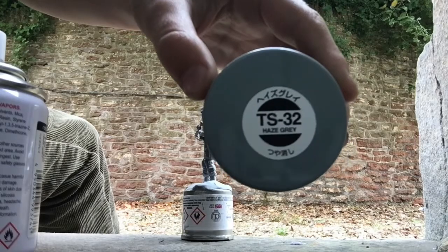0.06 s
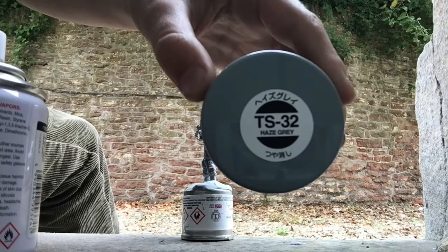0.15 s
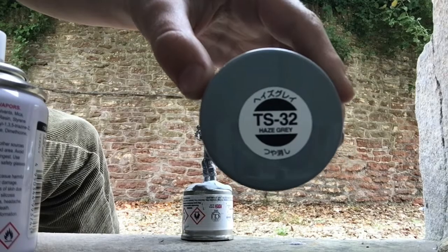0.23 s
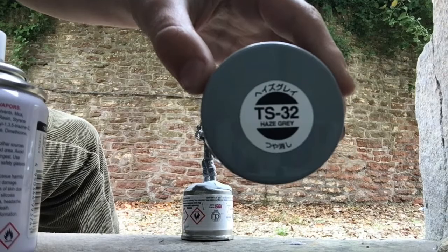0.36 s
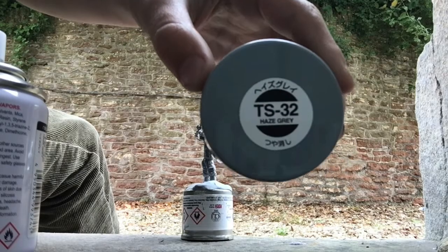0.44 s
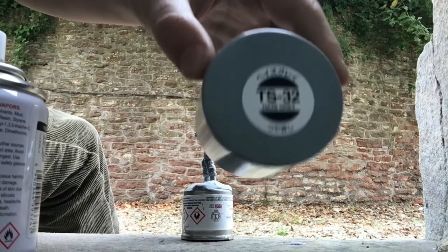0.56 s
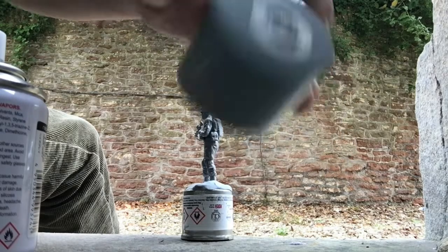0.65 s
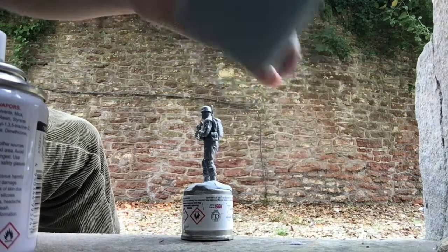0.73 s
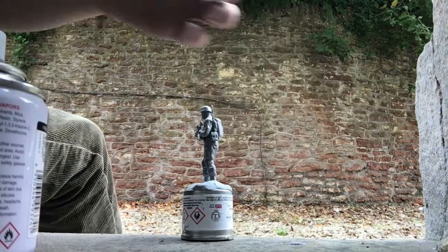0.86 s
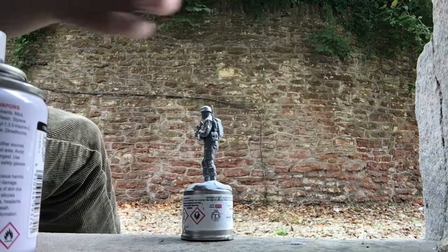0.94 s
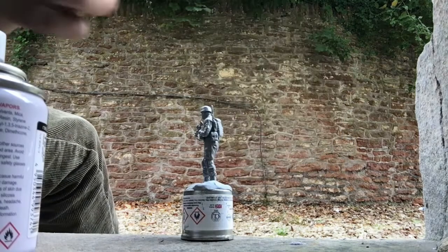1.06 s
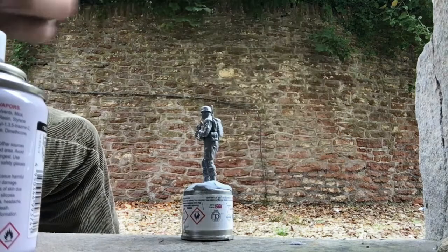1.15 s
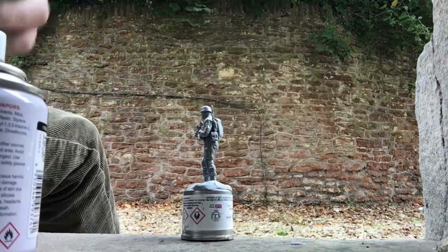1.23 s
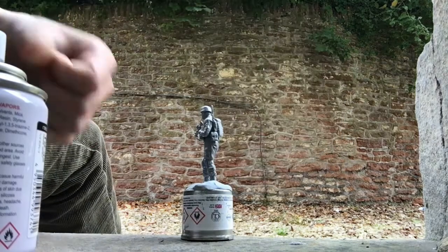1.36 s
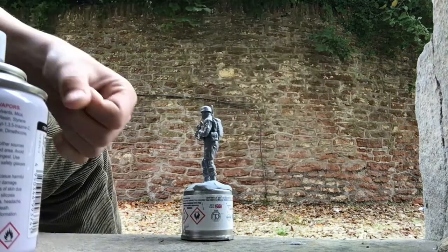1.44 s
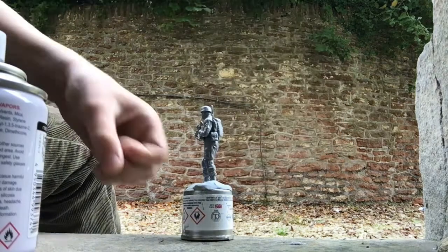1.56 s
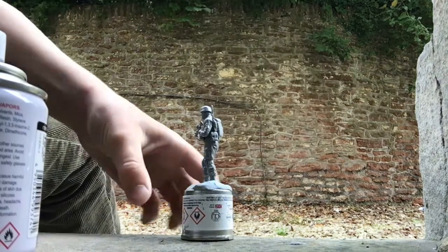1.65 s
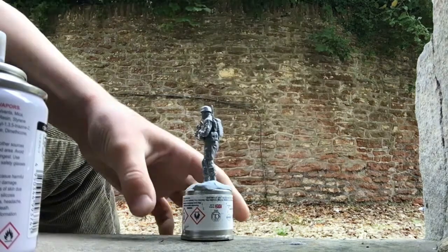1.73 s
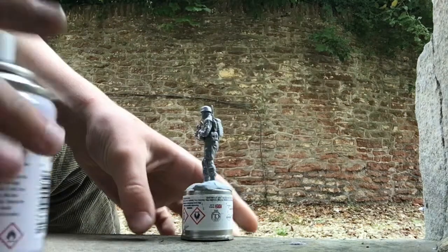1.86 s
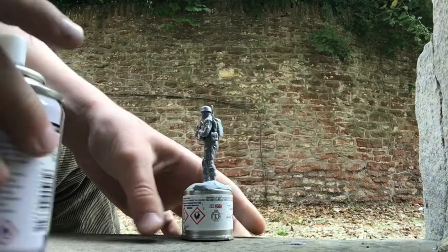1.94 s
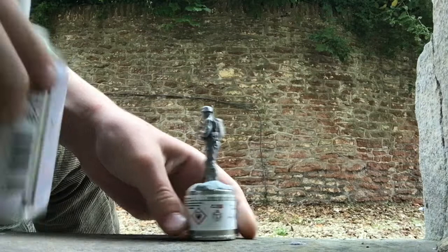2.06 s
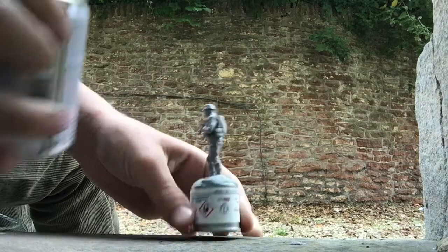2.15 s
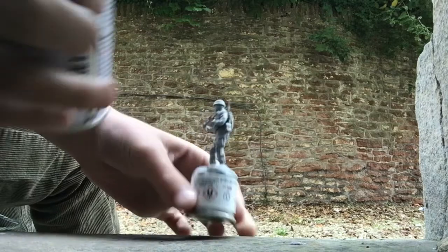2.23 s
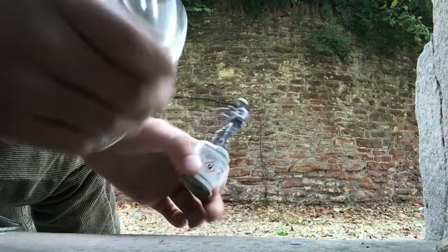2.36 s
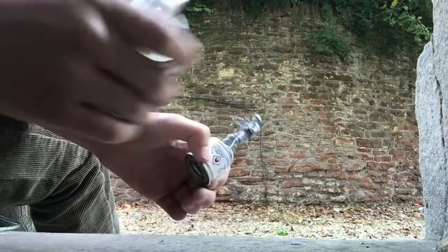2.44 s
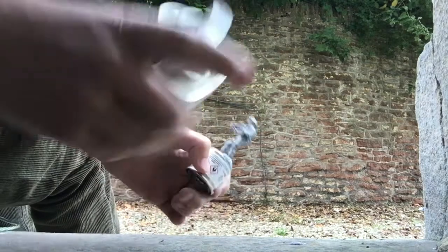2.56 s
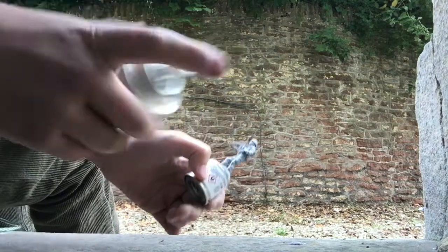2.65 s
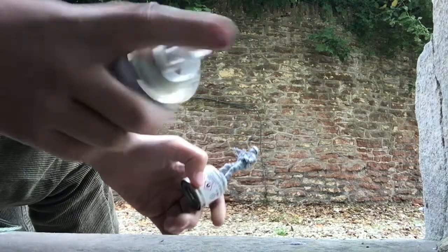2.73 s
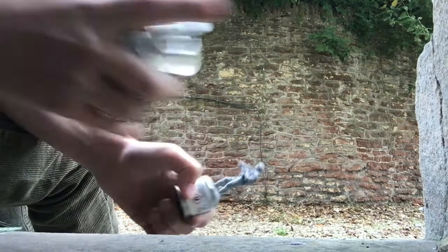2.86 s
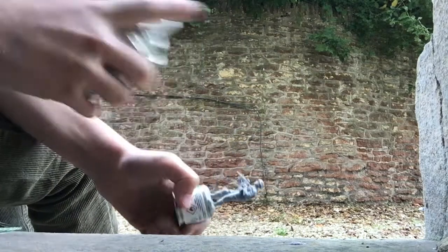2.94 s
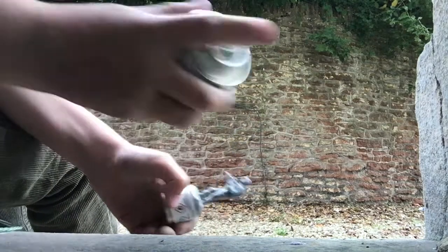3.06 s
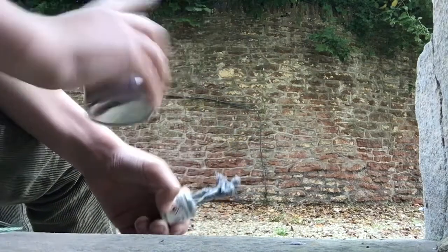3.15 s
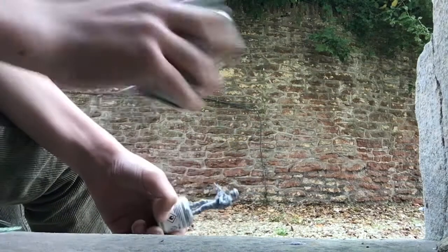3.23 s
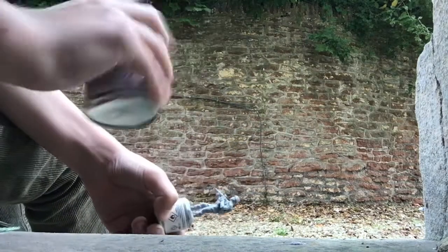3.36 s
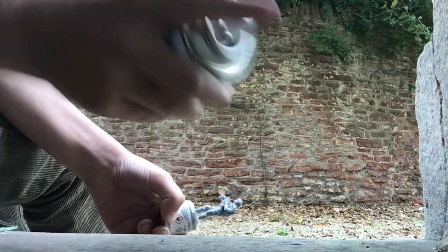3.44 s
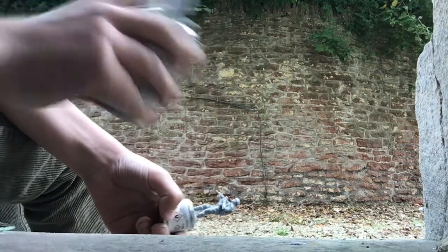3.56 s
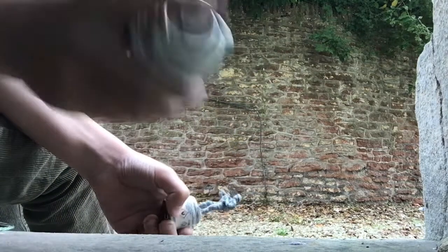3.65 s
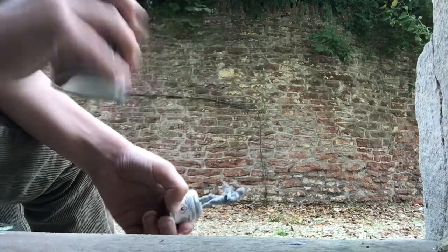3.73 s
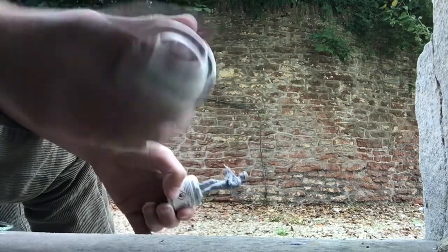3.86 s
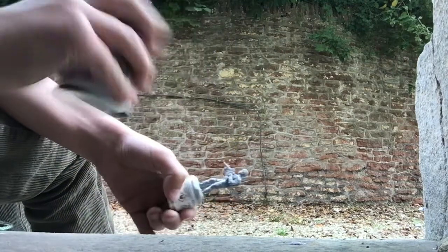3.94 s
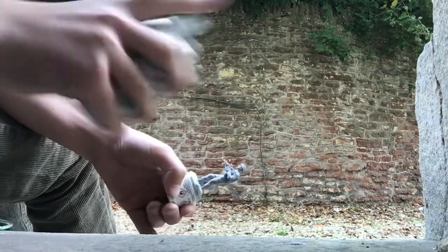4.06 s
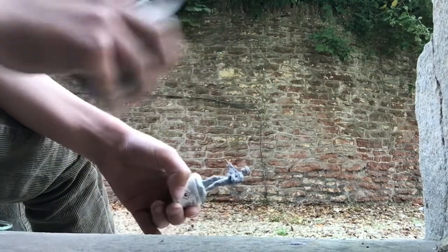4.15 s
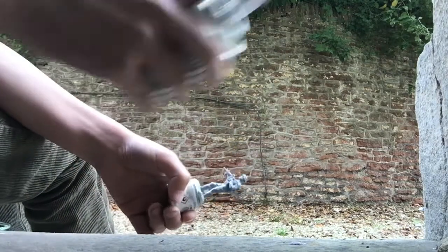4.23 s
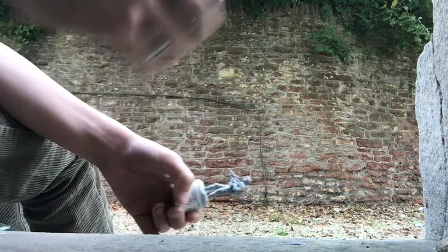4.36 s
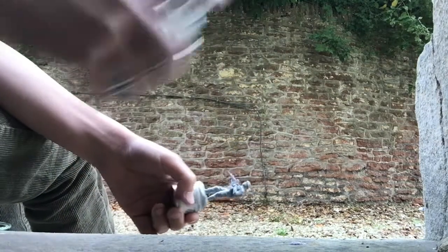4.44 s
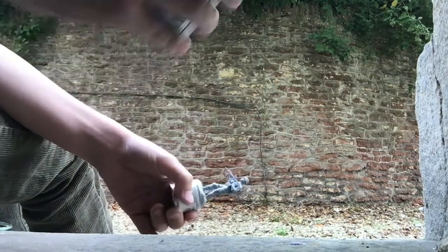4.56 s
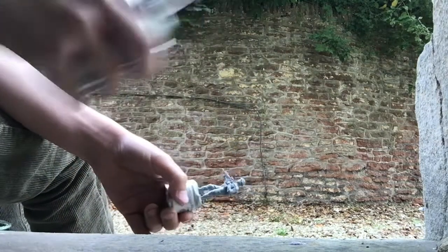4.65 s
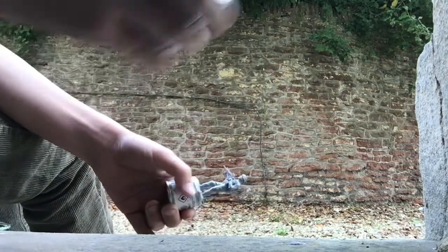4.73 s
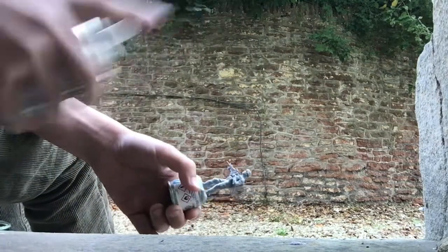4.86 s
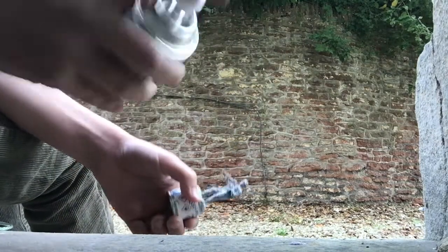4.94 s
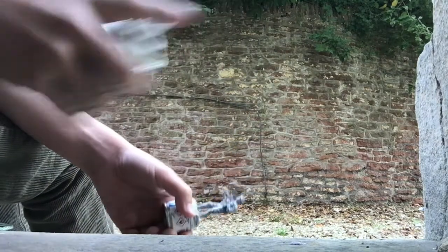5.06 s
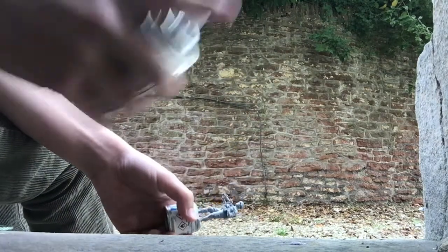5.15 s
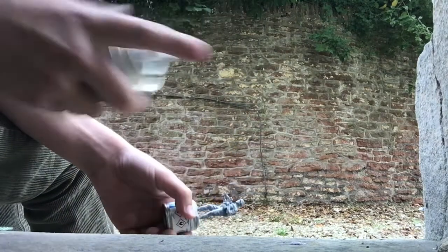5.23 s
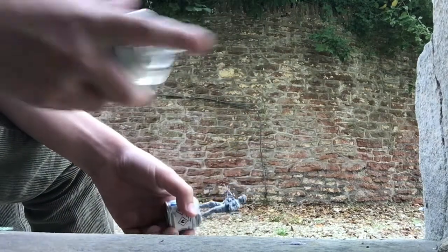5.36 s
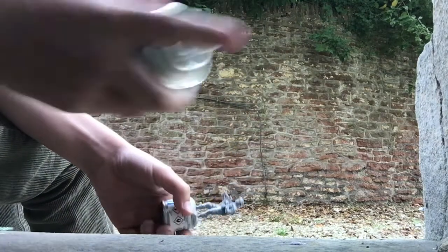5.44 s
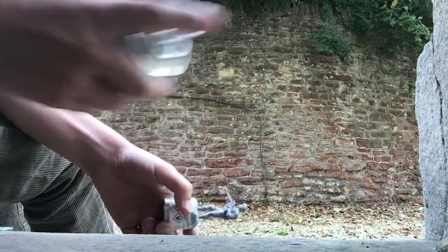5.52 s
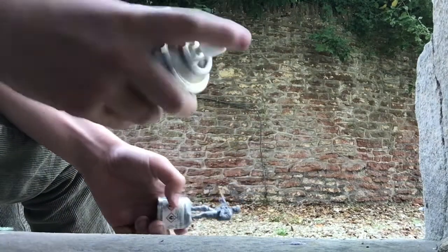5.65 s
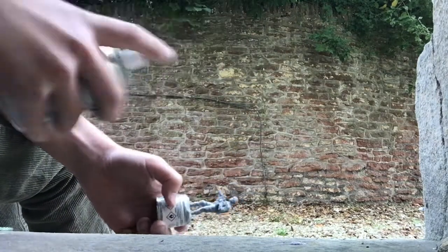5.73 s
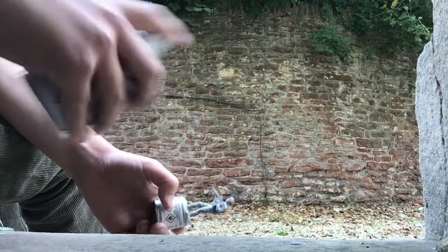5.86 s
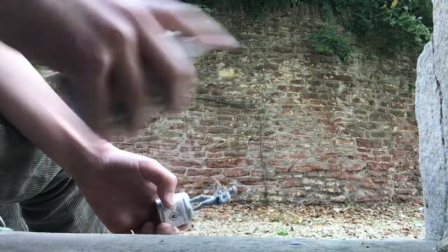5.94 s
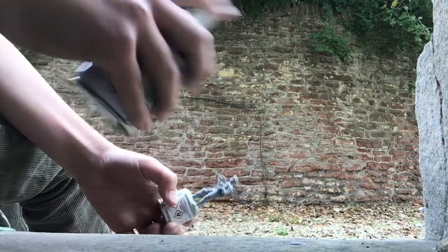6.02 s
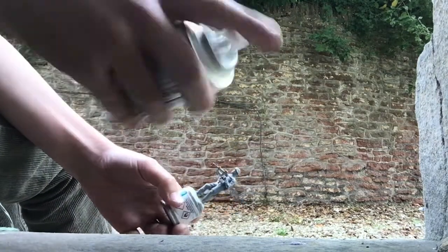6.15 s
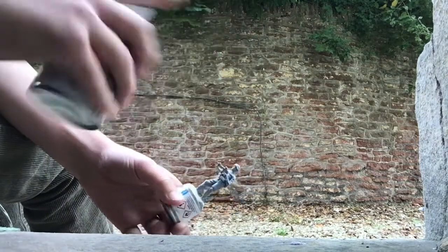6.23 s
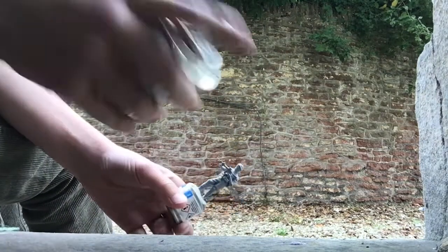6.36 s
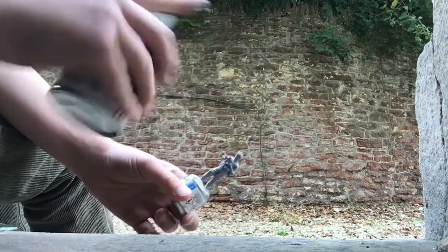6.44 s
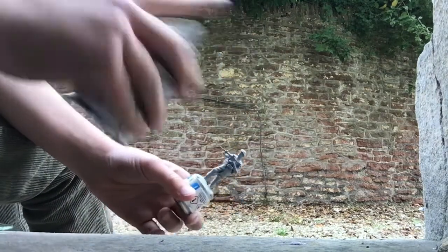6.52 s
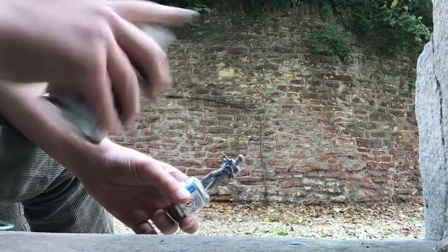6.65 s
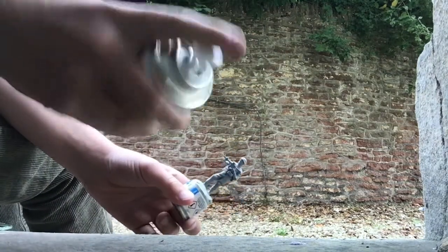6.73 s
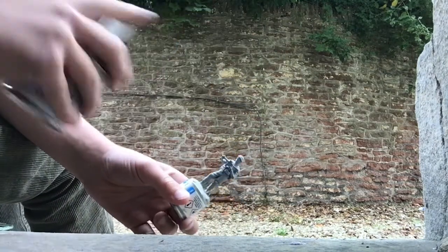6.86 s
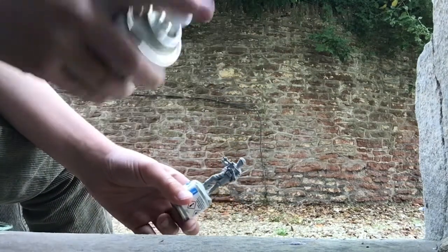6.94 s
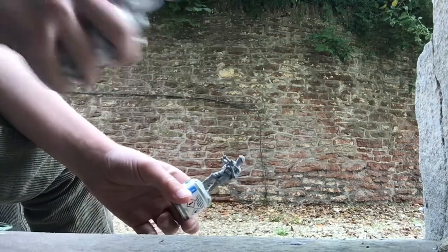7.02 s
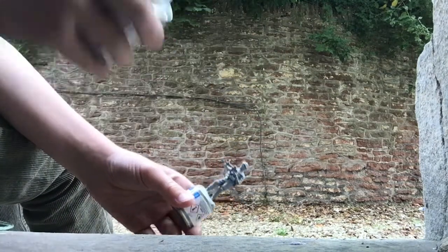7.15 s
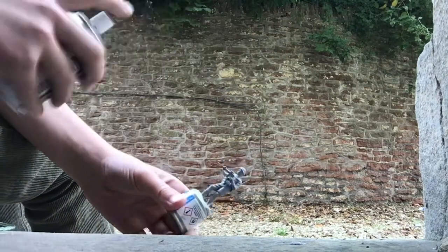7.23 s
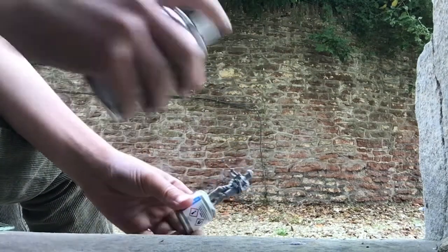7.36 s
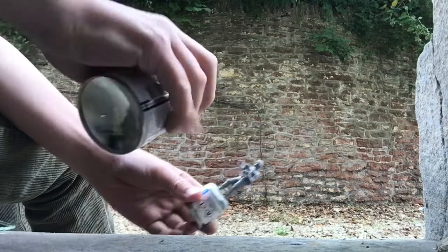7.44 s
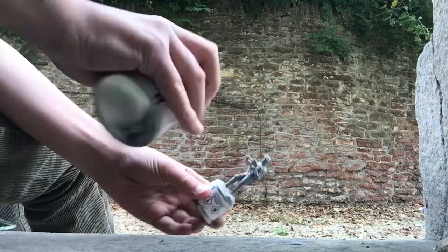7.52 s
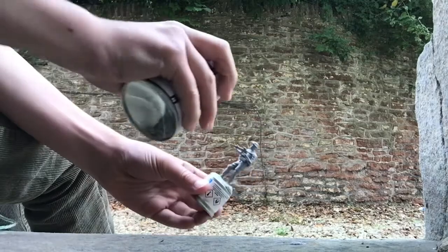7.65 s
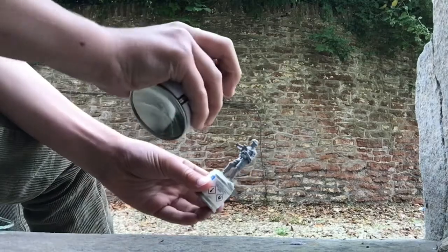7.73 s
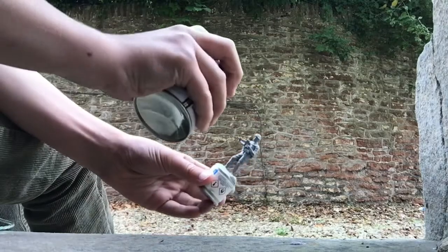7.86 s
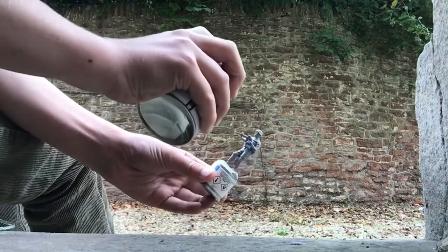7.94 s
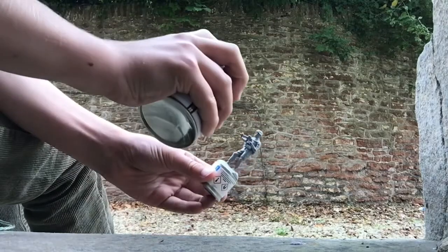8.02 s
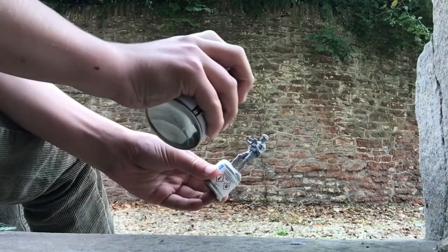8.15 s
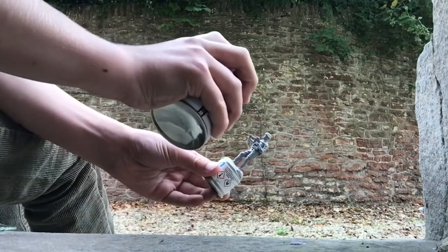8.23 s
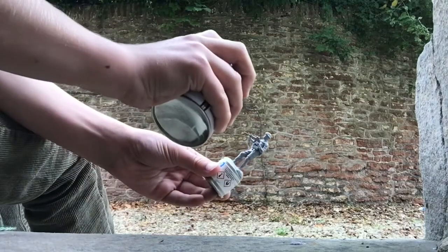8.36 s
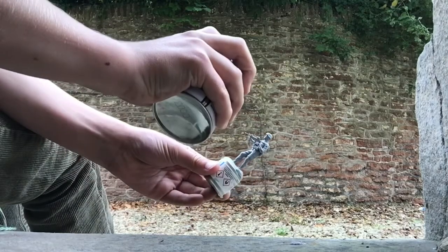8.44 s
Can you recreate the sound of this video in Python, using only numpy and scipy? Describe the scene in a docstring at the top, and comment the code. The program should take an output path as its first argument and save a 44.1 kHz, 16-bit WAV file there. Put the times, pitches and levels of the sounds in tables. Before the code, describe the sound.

Close view of a spray can being shaken in a yard with short reflections from brick and bench. First soft touches and a double-quick plastic clack, then a stuttering tinny scrape as the can is picked up. A hard metal ball then rattles fast and unevenly inside, sharp ticks mixed with wet fizz and occasional dull thumps, ending in weak taps over faint rumble and distant engine.

```python
"""A mixing ball clatters in a hard-shaken spray can: brief impacts excite resonances of the thin steel wall,
damped by the hand and the paint. At the end of each throw the paint slaps and fizzes as grainy noise, sometimes
with a thump of falling pitch and a puff of low noise. Before the shaking, a plastic cap lands on a bench and rocks,
and the can is nudged and brushed: struck resonances and shaped noise. Behind lie rumble, an airy hush, hiss and a
distant engine of three harmonics; near echoes and a thin tail stand for the brick wall, bench and ground."""
import sys
import numpy as np
from scipy import signal
from scipy.fft import rfft, irfft
from scipy.io import wavfile
from scipy.ndimage import uniform_filter1d, minimum_filter1d

SR = 44100
rng = np.random.default_rng(int(sys.argv[2]) if len(sys.argv) > 2 else 0)


def int16_out(signal):
    """Quantize to a 16-bit WAV file."""
    q = np.round(np.clip(np.atleast_2d(signal).T, -1, 1) * 32767)
    wavfile.write(sys.argv[1], SR, q.astype(np.int16))


N = 374409
TIME = np.arange(N) / SR

# Background levels: (time [s], rumble [dB], hush [dB], distant engine before its waver [dB])
BACKGROUND_LEVELS = [(0, -51, -62, -54), (.6, -52, -61.5, -59), (1.0, -49, -58, -63), (2.2, -49, -57, -77),
                     (3.7, -51, -61, -52), (5.5, -49.5, -52.5, -56.5), (7.3, -49.5, -60, -55.5),
                     (7.85, -46, -52, -46), (8.49, -46, -53.5, -60)]
# Noise spectra: (frequency [Hz], relative density [dB per Hz])
RUMBLE_SPECTRUM = [(15, -90), (25, -66), (61, -40.5), (96, -18), (140, -12.5), (178, -6.5), (227, -2),
                   (325, -10.5), (407, -13.5), (452, -16.5), (628, -17.5), (763, -15), (900, -26),
                   (1170, -56.5), (1980, -120)]
HUSH_SPECTRUM = [(530, -33), (900, 2), (1570, -2), (1740, 3.5), (2000, -1), (2720, -2), (3230, -8.5),
                 (3970, -15), (7000, -30), (9100, -70), (15400, -120)]
HISS_SPECTRUM = [(3000, -12.5), (6000, 2.5), (9000, -6.5), (11000, -3.5), (13000, -5), (15300, -1),
                 (16000, -11)]
PUFF_SPECTRUM = [(20, -24), (40, -13.5), (65, 0), (110, -2.5), (250, -31.5), (1000, -81)]
FIZZ_SPECTRUM = [(300, -28.5), (900, -13.5), (1600, -20), (2500, -9), (3400, -3.5), (4400, -2),
                 (5400, -2.5), (6000, -13), (6700, -0.5), (8200, -5), (10000, -16), (13000, -15.5),
                 (15800, -21)]
# Engine orders: (multiple of the mean fundamental [1], relative level [dB])
ENGINE_HARMONICS = [(1, -17.5), (2, -3.5), (3, 0)]
# Echoes from bench, ground and walls, before the treble loss: (delay [s], level [dB])
NEAR_ECHOES = [(.0017, -42.5), (0.0103, -23), (0.0126, -28.5), (.0228, -37), (0.0355, -44)]

# Fingers nudge the can and its rim stutters on the bench: (time [s], level before the common gain [dB])
CAN_NUDGES = [(1.033, -60), (1.189, -41.5), (1.748, -37), (1.7565, -29.5), (1.766, -28.5), (1.781, -26),
              (1.7858, -38), (1.801, -38.5)]
# Fingers brush and tap the can: (time [s], level [dB], Gaussian length [s])
FINGER_BRUSHES = [(0.708, -54.5, 0.017), (0.953, -49, 0.011), (1.036, -35.5, 0.0015), (1.05, -57, 0.018),
                  (1.188, -51, 0.0071), (1.946, -51.5, 0.012), (2.029, -39, 0.0019), (2.033, -64, 0.043)]
# Resonances of the standing can: (frequency [Hz], width [Hz], mean level [dB])
STANDING_CAN_MODES = [(440, 99, 0.5), (1240, 350, -6), (1720, 95, 6.5), (3180, 64, 5), (5240, 350, 2),
                      (5500, 240, 5.5), (7900, 240, 0), (10400, 500, -15.5), (12200, 1100, -20)]
# The cap lands and bounces: (time [s], level [dB], relative treble [dB], centre of the clack [Hz])
CAP_LANDINGS = [(1.3709, -8.5, -17, 1520), (1.3858, -7, -17, 1330), (1.392, -9.5, -17, 1130),
                (1.393, -17, -20, 317), (1.479, -26, -10, 1990), (1.4822, -23.5, -23, 390),
                (1.516, -26.5, -27, 427)]
# Resonances of the cap's body and of its thin click: (frequency [Hz], width [Hz], mean level [dB])
CAP_BODY_MODES = [(267, 420, -5.5), (632, 26, -4), (714, 19, 0), (908, 45, 5), (1070, 170, 4.5),
                  (1210, 300, 3), (1637, 220, 3), (1810, 270, 2.5), (2300, 470, -5), (2950, 36, 4),
                  (3430, 75, 3)]
CAP_CLICK_MODES = [(4500, 650, 3.5), (6300, 770, 1.5), (8200, 1300, -4.5), (10600, 890, -2),
                   (14000, 2500, -15)]

# Air pushed past the microphone by the swinging can: (time [s], level [dB])
AIR_PUFFS = [(3.33, -58.5), (3.43, -50), (3.63, -46), (4.14, -45), (4.31, -51), (4.86, -46), (6.68, -44.5),
             (6.87, -50)]
# The paint's weight thumps the can on the hardest throws: (time [s], level [dB])
PAINT_THUMPS = [(2.425, -30), (2.764, -6.5), (3.537, -31), (3.619, -25), (3.702, -30), (4.129, -27.5),
                (4.303, -29), (4.483, -33), (4.678, -20.5), (4.851, -23), (5.214, -27.5), (5.375, -30),
                (6.461, -27), (6.669, -35), (7.059, -20), (7.256, -34)]
# Gripped can in three registers, before stretch and damping: (frequency [Hz], width [Hz], mean level [dB])
LOW_WALL_MODES = [(1490, 1700, -13.5), (1897, 66, -3), (2254, 1050, 1.5), (2645, 547, 8.5),
                  (2581, 260, 4.5), (3140, 560, -5)]
MAIN_WALL_MODES = [(4046, 280, -8), (4260, 1760, -11), (4640, 120, -7), (4930, 1070, 0), (5416, 790, 2),
                   (5690, 180, -4.5)]
TICK_MODES = [(6570, 430, 4), (8290, 950, -6), (9110, 690, -6.5), (10600, 700, -11.5), (12500, 970, -13.5),
              (12800, 790, -13), (14570, 1800, -16.5)]
# Each throw strikes, glances along the wall and strikes again while the paint slaps the end:
# (time [s], first strike [dB], crossing [s], last strike [dB], mean glancing strike [dB],
#  lower ring relative to the strike at typical hardness [dB], paint slap before the common gain [dB])
BALL_THROWS = [(2.226, -24.5, 0.01, -19, -42, -4.5, -31), (2.251, -23, 0.014, -34, -42, -7.5, -40),
               (2.3058, -20, 0.0053, -11, -20, -7, -36), (2.348, -19, 0.0031, -20, -24, -5, -43),
               (2.388, -37, .016, -29, -57, -11, -53.5), (2.4256, -11, 0.018, -13, -41, -15, -20.5),
               (2.497, -31, .011, -14, -22, -12.5, -36.5), (2.5929, -14.5, 0.025, -13, -20.5, -8.5, -18.5),
               (2.667, -30, .0197, -21, -42, -5, -50), (2.6994, -13, 0.025, -24, -23, -6.5, -37),
               (2.763, -7, 0.033, -13.5, -20, -8.5, -16), (2.8716, -22, 0.014, -19, -43.5, -5, -38),
               (2.89, -14, 0.051, -25, -49, -2.5, -37), (2.9599, -14, 0.014, -11, -17, -8.5, -19),
               (3.003, -27.5, 0.0033, -59, -42, -3, -53), (3.0365, -20.5, 0.021, -13.5, -25.5, -5, -28.5),
               (3.1167, -21, 0.015, -24, -47, -4.5, -40), (3.1484, -23, .0177, -22, -27.5, -3.5, -32),
               (3.1907, -13, 0.014, -14.5, -37, -17.5, -34), (3.2182, -10, .01, -13.5, -31, -11, -27.5),
               (3.2365, -20, 0.042, -16, -27, -4.5, -38.5), (3.313, -12.5, 0.036, -17, -10.5, -13, -15.5),
               (3.3955, -21.5, 0.031, -14.5, -26, -9.5, -38), (3.49, -23, 0.0039, -44, -37, -6.5, -52),
               (3.5266, -13.5, 0.032, -23.5, -10.5, -12.5, -17.5),
               (3.6203, -9.5, 0.05, -12, -35, -4, -26.5), (3.6995, -11, 0.017, -2.5, -37, -10, -16),
               (3.7364, -13, .04, -13, -14.5, -12, -22.5), (3.8096, -16, 0.02, -18, -26.5, -2.5, -38),
               (3.8567, -13, 0.0072, -23.5, -40, -6.5, -42), (3.9136, -9.5, 0.022, -12.5, -20, -12.5, -16),
               (3.999, -27, .005, -18, -39.5, 0.5, -48), (4.0109, -20, 0.0069, -22.5, -50, -0.5, -48),
               (4.0423, -20, 0.0096, -23, -33.5, -8, -49), (4.1245, -10, 0.015, -10, -19, -7.5, -17.5),
               (4.178, -23, .013, -42.5, -48.5, -8.5, -55.5), (4.2047, -17, .0078, -20.5, -21, -2, -52),
               (4.3013, -1, 0.023, -35.5, -45.5, -7.5, -19.5),
               (4.3781, -24, 0.0044, -15, -45.5, -5.5, -37.5), (4.4831, -4.5, 0.018, -13, -39, -10, -20.5),
               (4.5328, -29, 0.014, -26, -47.5, -10, -50), (4.5702, -14, .006, -16, -36.5, -5, -42),
               (4.6184, -31.5, .004, -46.5, -56, -11, -68), (4.6777, -5, 0.019, -10, -20.5, -11, -21),
               (4.732, -34, 0.0084, -29, -50.5, -11, -58), (4.7596, -9, 0.028, -14, -19, -7.5, -45.5),
               (4.8512, -10, 0.03, -12.5, -17.5, -9.5, -15.5), (4.9135, -18.5, 0.037, -9, -25, -6.5, -49),
               (5.0212, -14.5, 0.024, -16, -15.5, -13, -16.5), (5.108, -11, .026, -12, -64, -3, -47),
               (5.2094, -8, 0.017, -20.5, -16, -10.5, -21), (5.2692, -40, 0.0093, -33.5, -53, -11, -55),
               (5.2972, -11.5, .018, -38, -46, -5.5, -32.5), (5.373, -7, 0.0036, -5.5, -27, -9.5, -22),
               (5.4564, -13, 0.034, -17, -24, -5.5, -33), (5.5482, -14, 0.025, -15.5, -34, -10.5, -17),
               (5.5886, -16.5, 0.0077, -19, -45, -11, -42), (5.6471, -17.5, .024, -12.5, -30, -9, -34),
               (5.6913, -22, 0.021, -24.5, -51, -8, -45), (5.7522, -12, 0.021, -29, -41, -15, -32),
               (5.7912, -29, .016, -28, -53, -6, -50), (5.8383, -15, 0.02, -19, -29.5, -4, -36),
               (5.889, -28, .0447, -13, -33, -13, -48), (5.9724, -11.5, 0.017, -20, -25.5, -10.5, -23),
               (6.0149, -19, .0114, -16, -27, -3.5, -51), (6.058, -21, 0.013, -8.5, -57, -7.5, -30),
               (6.0971, -18, 0.029, -31, -51, -6.5, -39), (6.143, -15.5, 0.047, -19, -18, -8, -35),
               (6.2143, -21, 0.061, -21.5, -28, -6.5, -41), (6.2895, -11.5, .03, -15, -20.5, -18, -21),
               (6.3384, -19.5, 0.032, -18.5, -16, -4.5, -33), (6.403, -16, 0.0082, -13, -75, -3.5, -31),
               (6.4611, -11.5, 0.029, -13.5, -17, -13, -17.5), (6.5358, -25.5, 0.021, -18, -35, -7, -58),
               (6.6149, -14, 0.0059, -27, -42, -5.5, -56), (6.6672, -13, 0.049, -20, -48, -8, -19),
               (6.7713, -14, 0.02, -14.5, -30, -5, -35), (6.8536, -11.5, .024, -16, -12.5, -14, -21),
               (6.9744, -14, .0186, -18.5, -56, -5, -37), (7.057, -3.5, 0.022, -14.5, -43.5, -8.5, -21),
               (7.132, -15, 0.038, -19.5, -26, -7, -42), (7.2579, -14.5, 0.052, -22, -55, -10, -25.5),
               (7.345, -28, 0.032, -23.5, -38, -3, -48), (7.4632, -35, .004, -41, -56, -5.5, -63),
               (7.499, -41, 0.017, -50, -52, -6.5, -62), (7.525, -30, 0.017, -26.5, -68, -1, -55),
               (7.5658, -42, 0.062, -39.5, -54.5, -7, -60)]
# The wall rings longer when hand and paint load it less: (time [s], damping factor on the widths [1])
GRIP_DAMPING = [(2.22, 0.31), (2.27, 0.28), (2.35, 0.98), (2.6, .9), (2.69, 0.47), (2.8, 1), (7.3, 1),
                (7.47, 0.36), (7.63, 0.44)]
# The lower ring and the tick wander as the shaking goes on:
# (time [s], lower ring before scatter [Hz], relative tick before hardness loss and scatter [dB])
RING_AND_TICK = [(2.24, 2600, -12.5), (2.31, 2550, -2.5), (2.5, 2200, -9), (2.6, 2530, -6.5),
                 (2.69, 2130, -7), (2.85, 2710, -8), (3.3, 2655, -8), (3.8, 2444, -10), (4.25, 2440, -9),
                 (4.9, 2250, -11), (5.2, 2554, -10), (6.0, 2560, -9.5), (6.45, 2580, -8),
                 (6.9, 2380, -12.5), (7.3, 2620, -9.5), (7.48, 2700, -7), (7.63, 2530, -11.5)]

ENGINE_HZ, HISS_DB = 76.2, -71.0  # mean fundamental
# The cap rocks on its rim ever more weakly: start [s], mean gap [s], initial level [dB], fade [dB/s]
ROCK_START_S, ROCK_GAP_S, ROCK_DB, ROCK_FADE_DB_PER_S = 1.406, .0145, -23.5, 148
ROCK_TREBLE_DB, ROCK_HZ, ROCK_SINK_OCTAVES_PER_S = -12, 1120, 9.0  # relative treble, initial pitch, fall
# A thump starts at (1 + GLIDE) times its final pitch and settles exponentially
THUMP_HZ, GLIDE, GLIDE_S = 179, 1.9, .0019

LOW_HZ, WALL_HZ = 2550, 5050  # reference pitches of the lower and main registers
SPOT_DB, SPOT_SHIFT = 2.2, .018  # scatter of mode levels; log scatter of tick pitch
# A harder strike rings higher, with relatively less lower ring and tick
TYPICAL_DB, LOW_LOSS_DB_PER_DB, TICK_LOSS_DB_PER_DB = -15, .5, .5
SOFT_STRIKE_HZ, FULL_STRIKE_RISE_HZ, PITCH_SCATTER_HZ = 4828, 1250, 165  # rise is that at 0 dB
LOW_SCATTER_DB, TICK_SCATTER_DB = 2.2, 3.0
LOW_RING_SCATTER = .075  # log pitch scatter, before the damping factor
GLANCE_JITTER, GLANCE_SCATTER_DB = .12, 2.5  # jitter as a share of the crossing
# Loose touches, relative to the two strikes before; later ones are fainter on average
TOUCH_REL_DB, TOUCH_SCATTER_DB, TOUCH_FADE_DB = -21.5, 6.5, 4
TOUCH_SPAN_S, FREE_FLIGHT_SHARE = .075, .3  # longest span; share of the gap left silent in free flight
CEILING, CUTOFF_HZ = .95, 15850  # limiter peak amplitude; upper band edge


def from_db(db):
    """Logarithmic level: decibels become an amplitude factor."""
    return 10 ** (np.asarray(db) / 20)


def rms_one(x):
    """Energy normalisation: scale to unit rms."""
    return x / np.sqrt(np.mean(x ** 2) + 1e-20)


def attack_one(x, size=176):
    """Onset normalisation: give the first four milliseconds unit rms."""
    return x / np.sqrt(np.mean(x[:size] ** 2) + 1e-20)


def add(out, s, sound):
    """Linear superposition: mix a sound in at a time in seconds."""
    at = max(0, round(s * SR))
    out[at:at + len(sound)] += sound[:max(0, N - at)]


def bandpass(order, low_hz, high_hz):
    """Band limitation: Butterworth filter sections between two frequencies."""
    return signal.butter(order, [low_hz, high_hz], "band", fs=SR, output="sos")


def noise(spectrum):
    """Spectral shaping: weight white noise by frequency and give it unit rms."""
    hz, db = np.transpose(spectrum)
    frequency = np.maximum(np.fft.rfftfreq(N, 1 / SR), 1)
    weight = from_db(np.interp(np.log(frequency), np.log(hz), db))
    return rms_one(irfft(rfft(rng.standard_normal(N)) * weight, N))


def contact(grit, skid_s, size):
    """Impulsive excitation: a sharp blow with a decaying, gritty skid."""
    force = grit * rng.standard_normal(size) * np.exp(-np.arange(size) / SR / skid_s)
    force[0] += 1
    return force


def resonate(force, modes, stretch=1, damping=1):
    """Modal superposition: parallel resonances, weighted anew as each blow lands on another spot."""
    out = 0
    for k, (hz, width, db) in enumerate(modes):
        radius = np.exp(-np.pi * width * damping / SR)
        angle = 2 * np.pi * hz * stretch / SR
        gain = from_db(db + SPOT_DB * rng.standard_normal()) * (1 - radius * radius) / 2
        poles = [1, -2 * radius * np.cos(angle), radius * radius]
        out = out + (-1) ** k * gain * signal.lfilter([1, 0, -1], poles, force)
    return attack_one(out)


def background():
    """Stationary noise and harmonic synthesis: rumble, hush, a wavering far engine and microphone hiss."""
    s, *columns = np.transpose(BACKGROUND_LEVELS)
    rumble, hush, engine = [from_db(np.interp(TIME, s, column)) for column in columns]
    waver = np.interp(TIME, np.linspace(0, TIME[-1], 40), rng.standard_normal(40))
    phase = 2 * np.pi * np.cumsum(ENGINE_HZ * (1 + .016 * waver)) / SR
    hum = rms_one(sum(from_db(db) * np.sin(round(k) * phase) for k, db in ENGINE_HARMONICS))
    engine_sound = engine * hum * from_db(2 * waver[::-1])  # time-reversed waver moves the level
    air = rumble * noise(RUMBLE_SPECTRUM) + hush * noise(HUSH_SPECTRUM)
    return air + engine_sound + from_db(HISS_DB) * noise(HISS_SPECTRUM)


def yard(x, tail_db=-18.5, t60=0.21, wall_cut_hz=8000):
    """Reflection and scattering: near echoes and an exponential noise tail, both low-passed."""
    t = TIME[:SR // 2]
    tail = rng.standard_normal(len(t)) * from_db(-60 * t / t60) * (1 - np.exp(-t / 0.00073))
    response = from_db(tail_db) * tail / np.sqrt(np.sum(tail ** 2))
    for delay, db in NEAR_ECHOES:
        response[round(delay * SR)] += from_db(db)
    response = signal.sosfilt(signal.butter(1, wall_cut_hz, fs=SR, output="sos"), response)
    return x + signal.fftconvolve(x, response)[:N]


def handling(nudge_db=3.0):
    """Free vibration and friction: the nudged standing can rings, and skin hisses over it."""
    out = np.zeros(N)
    for s, db in CAN_NUDGES:
        force = contact(grit=0.47, skid_s=0.0068, size=4000)
        add(out, s, from_db(db + nudge_db) * resonate(force, STANDING_CAN_MODES))
    rub = sum(from_db(db) * np.exp(-.5 * ((TIME - s) / length) ** 2) for s, db, length in FINGER_BRUSHES)
    skin_spectrum = [(100, -30), (1000, -1), (2900, -3), (3550, 2.5),  # (Hz, dB per Hz)
                     (4400, -8), (5500, -2), (7000, -7.5), (15000, -14)]
    return out + rub * noise(skin_spectrum)


def rocking(count=10):
    """Dissipation in repeated contact: uneven, dying cap touches that sink in pitch, as landing rows."""
    delays = ROCK_GAP_S * (np.arange(count) + rng.uniform(-.4, .4, count))
    rows = []
    for t in delays:
        hz = ROCK_HZ * 2 ** (-ROCK_SINK_OCTAVES_PER_S * t)
        rows.append((ROCK_START_S + t, ROCK_DB - ROCK_FADE_DB_PER_S * t, ROCK_TREBLE_DB, hz))
    return rows


def cap():
    """Selective modal excitation: the edge that lands chooses the hollow clack, under a thin click."""
    out = np.zeros(N)
    dull = signal.butter(2, 4200, fs=SR, output="sos")
    for s, db, treble, hz in CAP_LANDINGS + rocking():
        force = contact(grit=.06, skid_s=.0015, size=8000)
        edge = bandpass(1, hz / 1.4, hz * 1.4)
        body = resonate(signal.sosfilt(edge, force), CAP_BODY_MODES)
        click = resonate(contact(grit=0.66, skid_s=0.003, size=8000), CAP_CLICK_MODES)
        add(out, s, from_db(db) * (signal.sosfilt(dull, body) + from_db(treble) * click))
    return out


def puffs(length_s=0.0096):
    """Air displacement: soft low gusts from the swing, as noise under bell-shaped envelopes."""
    swell = sum(from_db(db) / (1 + ((TIME - s) / length_s) ** 2) for s, db in AIR_PUFFS)
    return swell * noise(PUFF_SPECTRUM)


def thumps(peak_s=0.004, sharpness=4.4):
    """Transient oscillation: a short dull knock whose pitch falls."""
    out, t = np.zeros(N), TIME[:SR // 20]
    shape = (t / peak_s * np.exp(1 - t / peak_s)) ** sharpness
    cycles = THUMP_HZ * (t + GLIDE * GLIDE_S * (1 - np.exp(-t / GLIDE_S)))
    for s, db in PAINT_THUMPS:
        add(out, s, from_db(db) * shape * np.sin(2 * np.pi * cycles))
    return out


def paint(level_db=-1.0, rise_s=0.00052, decay_s=0.017, linger_db=-22.5, linger_s=0.083, grain_db=5.0):
    """Modulated noise: each slap froths into a grainy fizz, then a weak wash as the paint runs back."""
    swell, t = np.zeros(N), TIME[:SR // 2]
    decay = np.exp(-t / decay_s) + from_db(linger_db) * np.exp(-t / linger_s)
    shape = (1 - np.exp(-t / rise_s)) * decay
    for s, *_, db in BALL_THROWS:
        add(swell, s, from_db(db) * shape)
    grains = from_db(grain_db * rms_one(uniform_filter1d(rng.standard_normal(N), size=70)))
    return from_db(level_db) * swell * rms_one(noise(FIZZ_SPECTRUM) * grains)


def rolling(level_db=-16.0, low_db=-2.5, grain_db=8.5, release_s=0.0053):
    """Friction-driven resonance: between strikes the ball scrapes a gritty murmur from the wall."""
    pressure = np.zeros(N)
    t = TIME[:SR // 5]
    for s, _, crossing, _, glancing, *_ in BALL_THROWS:
        add(pressure, s, from_db(glancing) * np.exp(-np.maximum(t - crossing, 0) / release_s))
    roughness = rms_one(uniform_filter1d(rng.standard_normal(N), size=90))
    grit = rng.standard_normal(N) * from_db(grain_db * roughness)
    wall = rms_one(resonate(grit, MAIN_WALL_MODES))
    wall += from_db(low_db) * rms_one(resonate(grit, LOW_WALL_MODES))
    return from_db(level_db) * pressure * signal.sosfilt(bandpass(2, 1300, 6600), wall)


def strikes(glance_count=2, touch_count=3):
    """Successive collisions: (s, dB, lower ring dB) of strikes, glances, and touches that fade on average."""
    out = []
    next_starts = [row[0] for row in BALL_THROWS[1:]] + [GRIP_DAMPING[-1][0]]
    for (s, first, crossing, last, glancing, low, _), following in zip(BALL_THROWS, next_starts):
        end = s + crossing
        # touches stop when the ball flies free, before the next throw lands
        loose_s = min(TOUCH_SPAN_S, (1 - FREE_FLIGHT_SHARE) * (following - end))
        out += [(s, first, low), (end, last, low)]
        for k in range(glance_count):
            share = (k + 1) / (glance_count + 1) + GLANCE_JITTER * rng.uniform(-1.1, 1)
            db = glancing + GLANCE_SCATTER_DB * rng.standard_normal()
            out.append((s + share * crossing, db, low))
        for k in range(touch_count):
            share = (k + rng.uniform(0, 1)) / touch_count
            db = (first + last) / 2 + TOUCH_REL_DB - k * TOUCH_FADE_DB
            db += TOUCH_SCATTER_DB * rng.standard_normal()
            out.append((end + share * loose_s, db, low))
    return out


def ball(shove_db=-26.5):
    """Impact excitation of a damped shell: a blow rings the wall and shoves the can; its skid ticks above."""
    out = np.zeros(N)
    below, around = bandpass(2, 900, 3600), bandpass(2, 3300, 6600)
    above = signal.butter(2, 5800, "high", fs=SR, output="sos")
    when, low_pitch, tick_db = np.transpose(RING_AND_TICK)
    for s, db, colour in strikes():
        hardness = db - TYPICAL_DB
        low = colour - LOW_LOSS_DB_PER_DB * hardness + LOW_SCATTER_DB * rng.standard_normal()
        tick = np.interp(s, when, tick_db) - TICK_LOSS_DB_PER_DB * max(hardness, 0)
        tick += TICK_SCATTER_DB * rng.standard_normal()
        hz = SOFT_STRIKE_HZ + FULL_STRIKE_RISE_HZ * from_db(db) + PITCH_SCATTER_HZ * rng.standard_normal()
        blow = contact(grit=.18, skid_s=.0008, size=1300)
        skid = contact(grit=0.63, skid_s=0.0016, size=1300)
        damping = np.interp(s, *np.transpose(GRIP_DAMPING))
        low_shift = np.exp(LOW_RING_SCATTER * damping * rng.standard_normal())
        tick_shift = np.exp(SPOT_SHIFT * rng.standard_normal())
        low_stretch = low_shift * np.interp(s, when, low_pitch) / LOW_HZ
        main_ring = resonate(signal.sosfilt(around, blow), MAIN_WALL_MODES, hz / WALL_HZ, damping)
        low_ring = resonate(signal.sosfilt(below, blow), LOW_WALL_MODES, low_stretch, damping)
        tick_ring = resonate(signal.sosfilt(above, skid), TICK_MODES, tick_shift, damping)
        shove = resonate(blow, [(365, 250, 0)])  # one low resonance (Hz, width Hz, dB)
        strike = main_ring + from_db(low) * low_ring + from_db(tick) * tick_ring + from_db(shove_db) * shove
        add(out, s, from_db(db) * strike)
    return out


def scene():
    """Superposition at the microphone: reflected sources plus direct thumps, puffs and background."""
    reflected = yard(ball() + rolling() + paint() + cap() + handling())
    return (reflected + thumps() + puffs() + background())[None]


def record(dry):
    """Peak limitation and band limitation: hold the loudest peaks; cut the deepest bass and the top."""
    lean = signal.sosfilt(signal.butter(2, 28, "high", fs=SR, output="sos"), dry)
    allowed = CEILING / np.maximum(np.abs(lean), CEILING)
    gain = uniform_filter1d(minimum_filter1d(allowed, size=31), size=31)
    top_cut = signal.ellip(10, .3, 80, CUTOFF_HZ, fs=SR, output="sos")
    return signal.sosfilt(top_cut, lean * gain)


dry = scene()
out = record(dry)
int16_out(out)
```